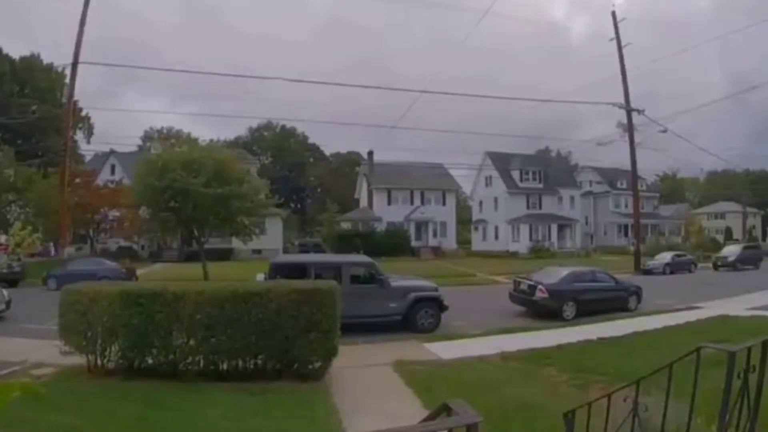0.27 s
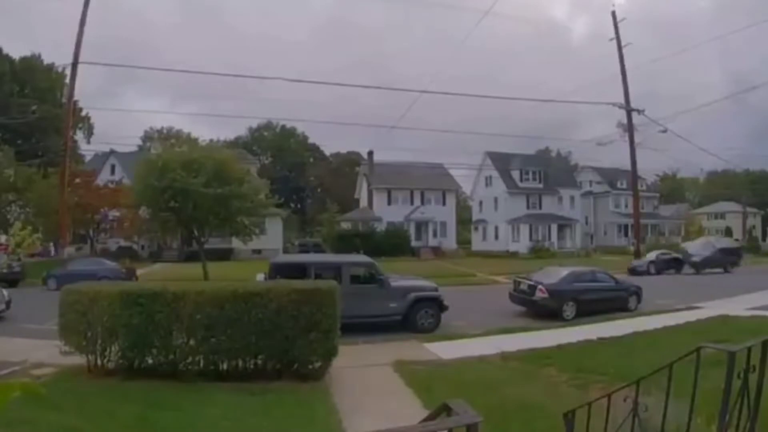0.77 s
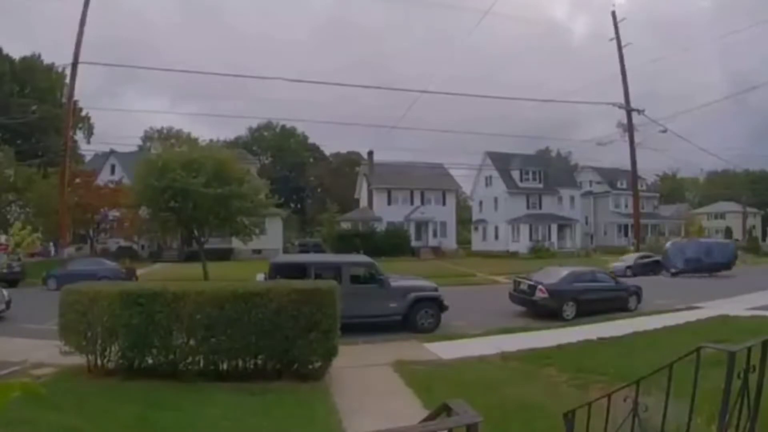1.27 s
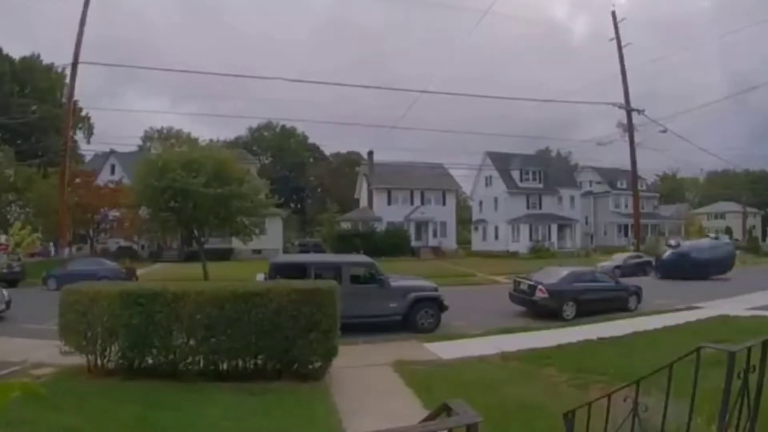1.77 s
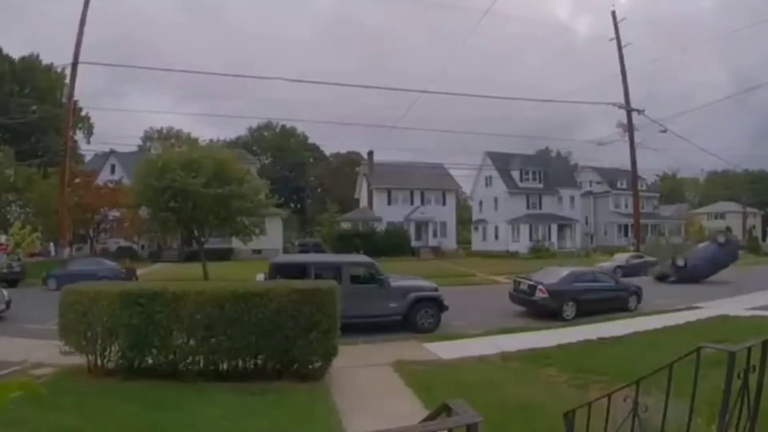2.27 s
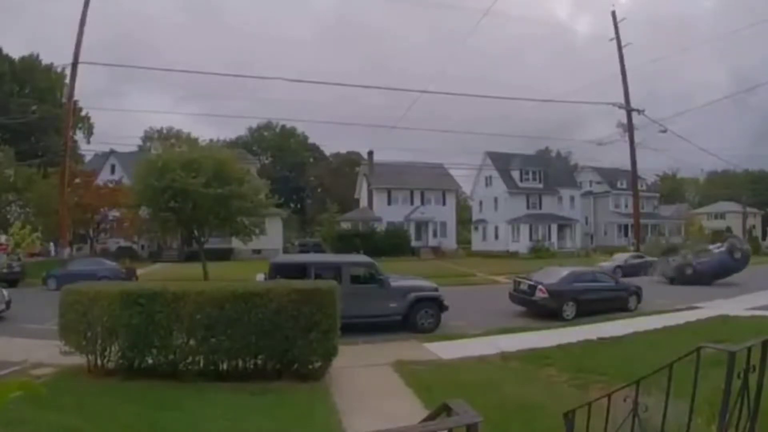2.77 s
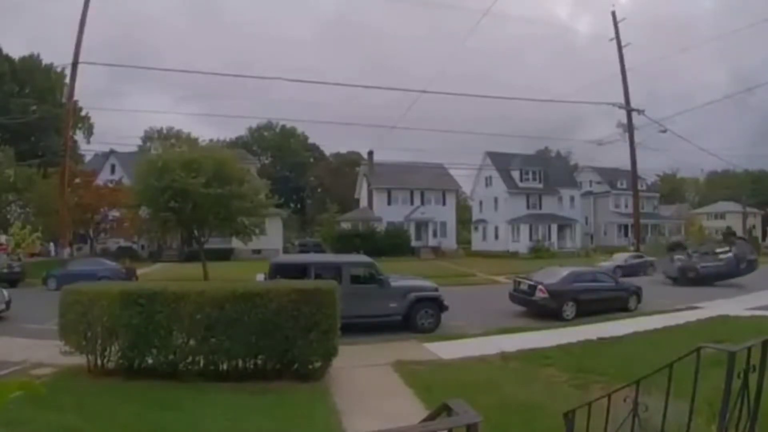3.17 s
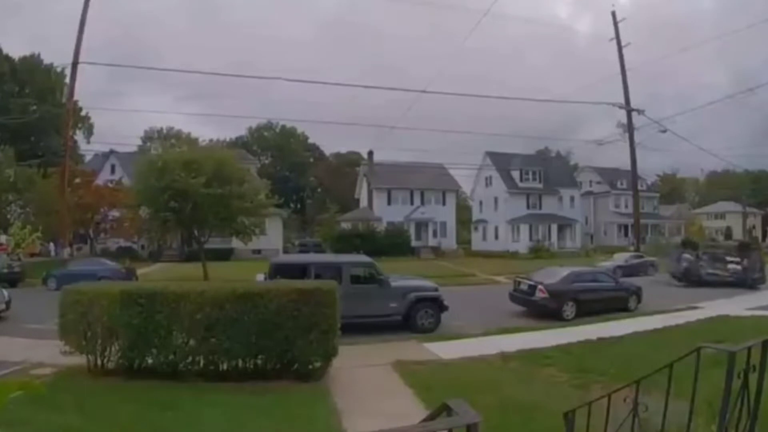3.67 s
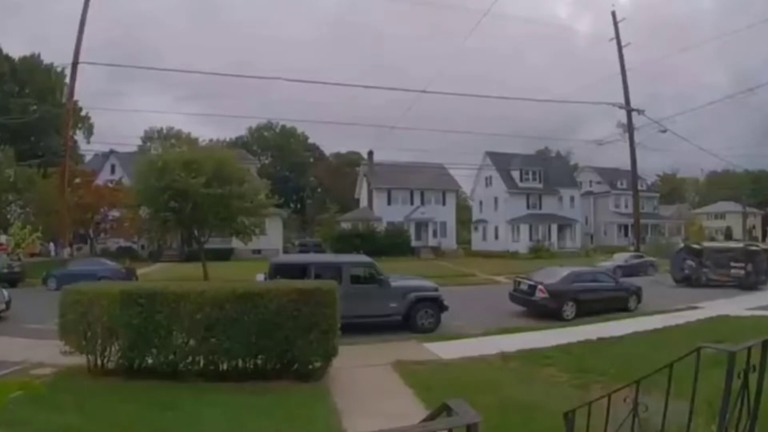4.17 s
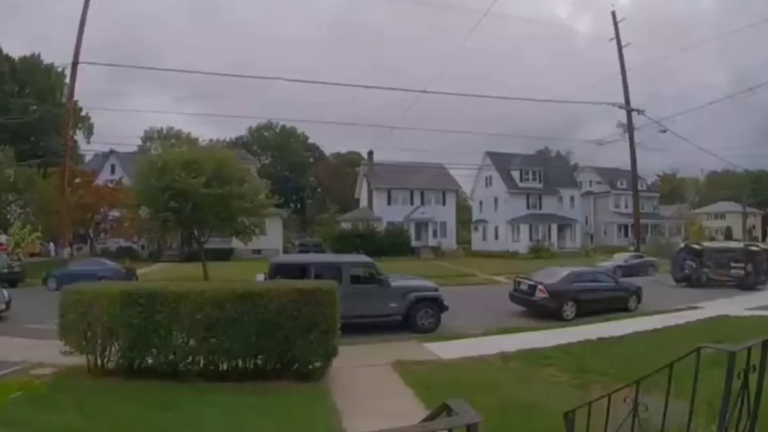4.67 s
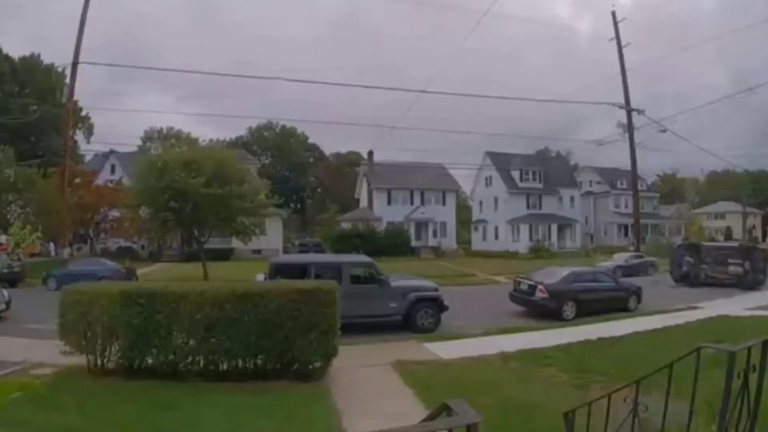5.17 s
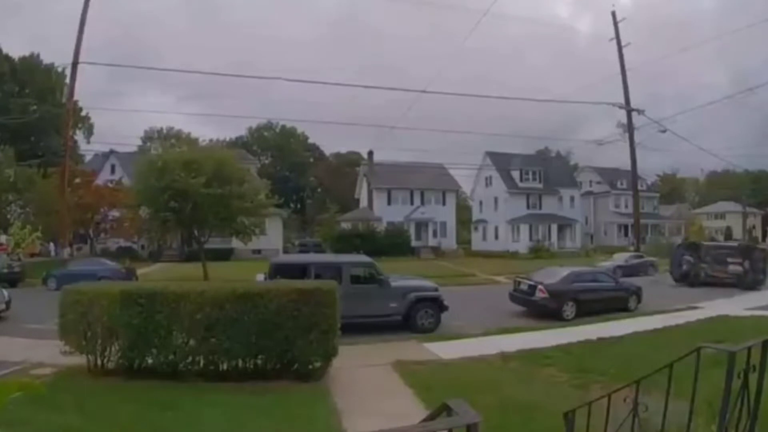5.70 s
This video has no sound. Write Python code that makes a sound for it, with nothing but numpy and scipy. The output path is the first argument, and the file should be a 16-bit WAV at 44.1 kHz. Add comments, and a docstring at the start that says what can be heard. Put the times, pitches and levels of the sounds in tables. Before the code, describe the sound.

A car hits another, rolls and slides on a quiet street. Low hollow body thuds mix with cracking panels and gritty, patchy scraping, strongest in the first two seconds and again just after three. A few very faint thin squeaks, then smaller knocks and short grinds. Faint outdoor street noise underneath, heard through a small, muffled distant microphone with a short tail off house fronts.

```python
"""A car strikes a parked car, tips over and slides on its side and roof down a quiet street, far from a porch.
Sheet metal grinds on asphalt: random grit sounded through panel resonances. The hollow shell booms in low
cabin modes and decaying tones, panels bang and crack in bursts of ticks; a few faint thin tones of single
pitch waver through. The house fronts return a short tail of sparse echoes, over a street bed of shaped noise.
The porch microphone opens a quarter second in; the treble drops steeply above 7 kHz."""
import sys
import numpy as np
from scipy import signal
from scipy.io import wavfile
from scipy.ndimage import uniform_filter1d

SR = 44100
rng = np.random.default_rng(int(sys.argv[2]) if len(sys.argv) > 2 else 0)


def wav_out(sig):
    """Save sig, one row per channel (or a flat mono array), as 16-bit PCM at SR to the path in sys.argv[1]."""
    wavfile.write(sys.argv[1], SR, np.round(np.clip(np.atleast_2d(sig).T, -1, 1) * 32767).astype(np.int16))


N = 261762

# Metal dragged over asphalt. Each row: time of full level in seconds, climb in dB per s, hold in seconds,
# level in dB, fade in dB per s, hiss above the panels in dB relative to that level.
SCRAPES = [(0.341, 400, 0.02, -19, 184, -1.5), (0.499, 164, .005, -21.5, 127, 3),
           (0.748, 300, 0.12, -41.5, 94, -5), (0.98, 350, .03, -40.5, 299, -3.5),
           (1.049, 901, 0.004, -22, 317, -4.5), (1.121, 1500, 0.023, -17.5, 195, 0),
           (1.227, 131, 0.0093, -10, 155, -4.5), (1.33, 300, .005, -27.5, 68, -6.5),
           (1.467, 304, 0.082, -23.5, 108, -1), (1.606, 151, .005, -18, 146, -6.5),
           (1.713, 303, .005, -21, 297, -2), (2.02, 220, .11, -10.5, 299, 4),
           (2.163, 297, 0.0046, -35, 77, 6.5), (2.695, 201, 0.022, -37.5, 84, -6.5),
           (2.823, 600, 0.021, -45.5, 303, 7), (3.054, 400, .005, -37, 94, 5.5),
           (3.24, 99, .005, -28.5, 285, -0.5), (3.353, 896, 0.027, -19.5, 289, -7),
           (3.505, 299, 0.036, -44, 302, -0.5), (3.589, 1501, 0.066, -30, 300, -27),
           (3.676, 491, .005, -18, 154, -1.5), (3.885, 402, 0.012, -45.5, 600, 9),
           (4.476, 504, .09, -30, 307, 1), (4.563, 900, 0.14, -23, 297, 1.5),
           (4.731, 196, 0.044, -26, 119, -8.5), (5.006, 400, .005, -31, 600, -37),
           (5.865, 497, 0.043, -33.5, 292, -16), (5.906, 597, 0.0071, -30.5, 1198, -10)]
# Faint creep of the wreck between scrapes, also under the booming.
# Each row: time in seconds, grinding in dB, rumble in dB.
CREEP = [(.3, -62, -50), (1.85, -50.5, -37), (2.45, -45.5, -42), (3.0, -72.5, -41), (4.0, -51.5, -48),
         (4.4, -51.5, -44.5), (5.15, -49.5, -45), (5.7, -55.5, -55)]


def grinding():
    """Dense grit through the panels; contact wanders, so patches of colour come and go."""
    rows = np.array(SCRAPES)
    body = rows[:, :5]
    hissing = body.copy()
    hissing[:, 3] += rows[:, 5]
    creep_s, creep_db, _ = np.transpose(CREEP)

    # one column of random colour per analysis frame, smoothed over frequency and then time
    patches = rng.standard_normal((N // 64 + 9, 129)).T
    patches = uniform_filter1d(patches, size=4, axis=0)
    patches = evened(uniform_filter1d(patches, size=30, axis=1))
    patchy_db = 1.8 * patches

    rub = narrow_bands(through_panels(grit(N, 6000, 3.)), 2.5)
    panel_band = signal.butter(4, [500, 2300], "band", fs=SR, output="sos")
    rub /= np.sqrt(np.mean(signal.sosfilt(panel_band, rub) ** 2))

    def level_db(hz, t):
        rest_db = np.interp(t, creep_s, creep_db)
        body_db = (1 - treble(hz)) * contact_db(t, body, rest_db)
        hiss_db = treble(hz) * contact_db(t, hissing, rest_db)
        return body_db + hiss_db - 2.48 * octaves(hz) + patchy_db[:, :len(t)]
    return shaped(rub, level_db)


# Panel resonances. Each row: centre in Hz, width in Hz, level in dB beside the direct ticks.
PANELS = [(552, 300, 10.5), (1125, 104, 10), (1523, 560, 10), (1990, 260, 7.5), (2980, 360, -1.5),
          (3450, 150, 4.5), (5000, 160, -7), (6400, 97, -2.5)]


def through_panels(x):
    """Ticks heard directly and through the ringing panels."""
    direct = signal.sosfilt(signal.butter(2, 450, "high", fs=SR, output="sos"), x)
    return direct + sum(gain_of(db) * resonate(x, hz, width) for hz, width, db in PANELS)


def grit(count, per_s, spread_db):
    """Stones and ridges catching the metal: random ticks of uneven size."""
    chance = rng.random(count)
    size = rng.exponential(1, count)
    sign = rng.standard_normal(count)
    return evened((chance < per_s / SR) * gain_of(spread_db * np.minimum(size, 5)) * sign)


def narrow_bands(x, depth_db):
    """Random narrow bands above 700 Hz swell and fade, giving the noise a patchy, tonal colour."""
    field = rng.standard_normal((len(x) // 256 + 9, 513)).T
    field = uniform_filter1d(field, size=3, axis=0)
    field = evened(uniform_filter1d(field, size=5, axis=1))
    return shaped(x, lambda hz, t: depth_db * field[:, :len(t)] * (hz > 700), size=1024)


def contact_db(t, rows, rest_db):
    """Each contact climbs, holds and fades; their powers add over the rest level."""
    s, climb, hold, db, fade = np.transpose(rows)[..., None]
    early = np.maximum(s - t, 0)
    late = np.maximum(t - s - hold, 0)
    each_db = db - climb * early - fade * late
    return 10 * np.log10((gain_of(each_db) ** 2).sum(0) + gain_of(rest_db) ** 2)


# The shell rocking over bumps. Each row: time of full level in seconds, climb in dB per s, hold in seconds,
# level in dB, fade in dB per s.
RUMBLES = [(0.317, 271, 0.055, -22.5, 162), (0.503, 130, .12, -22.5, 150), (0.804, 100, 0.036, -42, 49.5),
           (.996, 352, .005, -29.5, 104), (1.077, 402, 0.036, -20, 503), (1.157, 405, 0.072, -11, 116),
           (1.34, 202, 0.073, -25.5, 299), (1.467, 497, 0.018, -18, 53), (1.676, 96, 0.052, -20, 468),
           (1.931, 582, 0.039, -14.5, 177), (2.124, 121, .005, -11, 204), (2.708, 810, 0.083, -29.5, 195),
           (2.848, 255, .005, -22.5, 77), (3.065, 133, .005, -21.5, 147), (3.177, 797, 0.0057, -21.5, 402),
           (3.372, 312, 0.023, -9.5, 262), (3.569, 239, .003, -20, 1504), (3.731, 176, 0.0059, -13, 186),
           (4, 303, .005, -42, 230), (4.172, 500, .005, -45, 132), (4.461, 702, 0.11, -27, 100),
           (4.552, 801, 0.26, -22, 167), (5.015, 492, .005, -31.5, 1000), (5.796, 297, 0.023, -38.5, 295),
           (5.852, 1300, .003, -23, 895), (5.93, 898, .005, -21, 300)]
# Cabin modes. Each row: centre in Hz, nominal width in Hz, relative level in dB.
SHELL = [(38, 39, -10), (106.4, 12, -3.5), (124.6, 32, -2.5), (185.5, 68.3, 3.5), (246, 75, 1),
         (291, 160, -18.5), (403, 170, -19.5)]
# Blows that set the shell booming. Each row: time in seconds, peak in dB, pitch in Hz, 60 dB decay in seconds.
THUDS = [(0.313, -40, 184, 0.13), (.364, -14.5, 251, 0.22), (0.474, -19, 103.4, 0.2),
         (0.534, -22.5, 111, .12), (0.58, -15, 216, .1), (0.813, -24.5, 176, 0.031),
         (.987, -22.5, 161.5, .11), (1.054, -13.5, 264, 0.038), (1.14, -6.5, 202, 0.089),
         (1.334, -17, 178, 0.18), (1.47, -14, 183, 0.28), (1.595, -10, 223.3, 0.31), (1.709, -33, 106, 0.1),
         (1.713, -3, 199.4, 0.074), (1.921, -21, 105, .12), (1.923, -13.5, 200, 0.036),
         (2.074, -5.5, 234, 0.044), (2.751, -28, 128, .1), (2.821, -9.5, 530, 0.05),
         (2.828, -11, 122.5, .1), (2.86, -17, 150, 0.086), (2.9, -24, 168, .08), (2.991, -21, 210, 0.044),
         (3.03, -13.5, 129.4, .14), (3.33, -9.5, 222, .09), (3.35, -7, 236.4, 0.11), (3.38, -3, 221, 0.046),
         (3.525, -22.5, 448, 0.047), (3.562, -12, 272, 0.041), (3.673, -11.5, 212, 0.08),
         (4.0, -33, 200, 0.07), (4.158, -29.5, 204, .1), (4.685, -17, 288, 0.17), (4.887, -20.5, 249, .071),
         (4.973, -19, 338, 0.043), (5.24, -20, 233, 0.07), (5.3, -37, 200, .07), (5.793, -26.5, 213, 0.11),
         (5.848, -20.5, 247, 0.063)]
THUD_RISE_S = 0.0068


def booming():
    """Bumps in the road shake the cabin modes; single blows ring as decaying tones."""
    creep_s, _, creep_db = np.transpose(CREEP)
    coarse = np.arange(0, N + 64, 64) / SR
    boom_db = contact_db(coarse, RUMBLES, np.interp(coarse, creep_s, creep_db))
    boom_db = np.interp(np.arange(N) / SR, coarse, boom_db)

    bumps = grit(N, 1200, 2.2)
    modes = np.zeros(N)
    for hz, width, db in SHELL:
        # two passes of doubled width give each mode steeper skirts
        once = resonate(bumps, hz, 2 * width)
        modes = modes + gain_of(db) * resonate(once, hz, 2 * width)
    out = gain_of(boom_db) * evened(modes)

    t = np.arange(SR // 3) / SR
    start_turns = rng.random(len(THUDS))
    for (s, db, hz, t60), turn in zip(THUDS, start_turns):
        tone = np.sin(2 * np.pi * (hz * t + turn))
        add(out, s - .5 * THUD_RISE_S, gain_of(db) * swell(t, THUD_RISE_S, t60) * tone)
    return out


# Bangs and cracks. Each row: time in seconds, level in dB, ring in Hz, 60 dB decay in seconds,
# brightness in dB per octave, weight of the low panels in dB.
BANGS = [(.326, -16, 1023, 0.27, 4, -4), (.477, -16.5, 2550, 0.14, -1, -2),
         (.753, -27.5, 1390, .073, -8, -28), (1.046, -12.5, 1197, 0.098, -4, 7),
         (1.124, -11.5, 2350, 0.032, 2.5, 3), (1.212, -13, 760, 0.05, -8, 5),
         (1.244, -10, 1680, 0.21, 3, -10), (1.279, -21, 2140, 0.053, 4, -10),
         (1.711, -15, 3314, .034, 4, 15.5), (1.742, -13, 3400, 0.11, 32, -7),
         (1.866, -11, 3720, 0.017, 1.5, -15), (1.89, -14, 3270, 0.033, -1.5, -4),
         (1.956, -8, 1353, 0.25, 3.5, 6.5), (2.508, -35.5, 3830, 0.046, 5.5, 2),
         (2.599, -24.5, 1145, 0.045, 10, 4), (2.651, -19.5, 1780, 0.058, 0.5, -4),
         (2.66, -19, 1980, 0.026, -7, -3), (2.695, -26.5, 1880, 0.068, -16, -13),
         (2.75, -22.5, 1030, .02, -19, 8), (2.82, -7, 534, .035, -4.5, 4.5),
         (2.847, -30.5, 562, 0.03, 9, 2), (2.938, -19, 1680, 0.026, 2, -2),
         (2.943, -15, 1610, 0.021, 3.5, 9), (3.03, -5.5, 1160, 0.043, 0.5, 6.5),
         (3.056, -6.5, 1316, 0.054, 2, 4), (3.083, -9, 1096, 0.032, -1.5, -22),
         (3.171, -18.5, 1590, 0.05, 0, 1.5), (3.229, -24.5, 1310, 0.19, 1, 1),
         (3.264, -18.5, 3156, 0.074, 2, -23), (3.29, -28.5, 1540, 0.044, -1.5, -13),
         (3.355, -11.5, 550, .16, -3.5, -15), (3.385, -14, 1790, 0.071, -4.5, -12),
         (3.594, -21, 640, 0.06, -13.5, -5.5), (3.678, -16, 1500, 0.097, -11, 3),
         (3.794, -21, 1775, 0.084, 4, -9), (3.879, -30, 3300, 0.13, -1, -16),
         (4.46, -27.5, 1600, 0.083, 4, -12), (4.485, -27, 3410, .077, 0, -10),
         (4.51, -20.5, 1660, .055, 22, -4), (4.557, -9.5, 1670, 0.09, 0.5, -12),
         (4.738, -15, 2140, 0.042, -3.5, 4.5), (4.972, -16.5, 2063, 0.063, -1, 14.5),
         (5.234, -17, 556, 0.042, 1, 5.5), (5.811, -31, 2140, 0.025, 1.5, 11),
         (5.851, -23, 2184, 0.18, -23, 18), (5.921, -22, 645, 0.098, -8, 5)]
BANG_BANDS_DB, BANG_RISE_S = 3.5, .006
RING_SHARE, RING_FADE_DB_PER_S = 0.37, 348.5  # share of power; fade on top of the bang's own decay


def banging():
    """A burst of ticks as the metal buckles, through all panels and one patch that rings out."""
    out = np.zeros(N)
    t = np.arange(SR // 4) / SR
    below_8k = signal.butter(4, 8000, fs=SR, output="sos")
    for s, db, ring_hz, t60, bright, weight_db in BANGS:
        ticks = grit(len(t), 9000, 1.2)

        def colour_db(hz, after):
            tilt_db = bright * octaves(np.minimum(hz, 7500))
            return tilt_db + weight_db * (hz < 900) - 150 * after * treble(hz)  # the hiss dies first
        crack = shaped(narrow_bands(through_panels(ticks), BANG_BANDS_DB), colour_db)
        crack = signal.sosfilt(below_8k, crack)
        crack = crack / np.std(crack[:SR // 40])

        struck = np.sin(2 * np.pi * ring_hz * t)
        rattled = evened(resonate(ticks, ring_hz, 170))
        patch = gain_of(-RING_FADE_DB_PER_S * t) * evened(struck + 0.73 * rattled)

        metal = np.sqrt(1 - RING_SHARE) * crack + np.sqrt(RING_SHARE) * patch
        add(out, s - .5 * BANG_RISE_S, gain_of(db) * swell(t, BANG_RISE_S, t60) * metal)
    return out


# Faint thin tones and two short squeaks. Each row: start in seconds, level in dB, pitch in Hz,
# 60 dB decay in seconds.
THIN_TONES = [(0.756, -38, 1387, 0.062), (0.799, -31, 1400, 0.063), (4.038, -37.5, 5170, 0.086),
              (4.08, -52.5, 5190, 0.81), (4.13, -44.5, 3470, 0.33), (4.19, -52, 5270, .15),
              (4.2, -52, 2090, .6), (4.279, -47, 1930, 0.3), (4.35, -40, 1945, 0.065)]


def thin_tones():
    """Faint thin tones and two short squeaks, each at one pitch, wavering in level."""
    out = np.zeros(N)
    t = np.arange(SR // 3) / SR
    for s, db, hz, t60 in THIN_TONES:
        wobble = 1 + 0.28 * evened(uniform_filter1d(rng.standard_normal(len(t)), size=500))
        add(out, s, gain_of(db) * swell(t, 0.026, t60) * wobble * np.sin(2 * np.pi * hz * t))
    return out


# Tail off the houses. Each row: frequency in Hz, 60 dB decay in seconds.
FRONTS = [(150, 0.13), (600, 0.22), (2000, 0.14), (4000, 0.17), (7000, 0.088)]


def house_fronts(x):
    """Sparse echoes of random sign, each band dying at its own speed."""
    taps = np.zeros(SR // 2)
    at = np.arange(500, SR // 2 - 20, 20)
    at = at + rng.integers(0, 20, len(at))
    taps[at] = rng.choice([-1., 1.], len(at))
    tail = shaped(taps, lambda hz, t: -60 * t / read(FRONTS, hz))
    return signal.fftconvolve(x, tail / np.linalg.norm(tail))[:N]


# Far traffic and leaves. Each row: frequency in Hz, relative density in dB per Hz.
STREET = [(30, -27.5), (100, -16), (220, 1.5), (500, -19), (1300, -9.5), (2200, -24.5), (4000, -18.5),
          (7000, -25.5), (9000, -35.5)]
STREET_DB = -56  # rms of the whole bed


def street():
    """Distant traffic and leaves as steady noise of a fixed colour."""
    bed = shaped(rng.standard_normal(N), lambda hz, t: read(STREET, hz), size=2048)
    return gain_of(STREET_DB) * evened(bed)


def gain_of(db):
    """dB to gain."""
    return 10 ** (np.asarray(db) / 20)


def evened(x):
    """Scales to rms 1."""
    return x / np.sqrt(np.mean(x ** 2) + 1e-20)


def read(points, hz):
    """Reads a table on a log-frequency axis."""
    f, value = np.transpose(points)
    return np.interp(np.log(hz + 1), np.log(f + 1), value)


def add(mix, s, sound):
    """Mixes a sound in at time s."""
    part = mix[round(s * SR):][:len(sound)]
    part += sound[:len(part)]


def resonate(x, hz, width):
    """One resonance of about gain 1 at its centre: a decaying complex rotation."""
    pole = np.exp((2j * np.pi * hz - np.pi * width) / SR)
    return 2 * signal.lfilter([1 - abs(pole)], [1, -pole], x).real


def shaped(x, db_at, size=256):
    """Applies a gain in dB over frequency and time."""
    overlap = size * 3 // 4
    hz, t, z = signal.stft(x, SR, nperseg=size, noverlap=overlap)
    z = z * gain_of(db_at(hz[:, None], t))
    return signal.istft(z, SR, nperseg=size, noverlap=overlap)[1][:len(x)]


def octaves(hz):
    """Octaves from 1.5 kHz, held constant below 700 Hz."""
    return np.log2(np.maximum(hz, 700) / 1500)


def treble(hz):
    """0 in the body of the panels, 1 in the hiss above them."""
    return np.clip(np.log2(hz / 2100 + 1e-9) / .5, 0, 1)


def swell(t, rise, t60):
    """Soft start, exponential fall, peak 1."""
    shape = (1 - np.exp(-(t / rise) ** 2)) * gain_of(-60 * t / t60)
    return shape / shape.max()


def scene():
    """The crash, its echo and the street."""
    crash = grinding() + booming() + banging() + thin_tones()
    return (crash + gain_of(-14.5) * house_fronts(crash) + street())[None]


# Colour of the whole sound: steep drop above 7 kHz, faint band near 8.6 kHz.
# Each row: frequency in Hz, gain in dB.
COLOUR = [(25, -15), (60, -16.5), (100, 4.5), (300, -4.5), (6000, 1), (6900, 0.5), (7300, -9.5),
          (7700, -51), (8600, -26), (9200, -52)]
OPENS_S, EDGE_HZ = 0.25, 8850


def record(dry):
    """The microphone opens, loud peaks are softly held, then come the overall colour and the band limit."""
    opened = dry[0] * np.clip((np.arange(N) / SR - OPENS_S) / 0.011, 0, 1)
    held = .8 * np.tanh(opened / .8)
    coloured = shaped(held, lambda hz, t: read(COLOUR, hz), size=1024)
    band_limit = signal.firwin(511, EDGE_HZ, window=("kaiser", 9), fs=SR)
    return signal.oaconvolve(coloured, band_limit, "same")[None]


dry = scene()
out = record(dry)
wav_out(out)
```